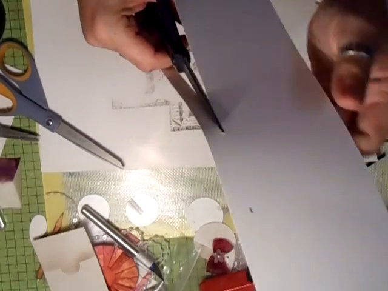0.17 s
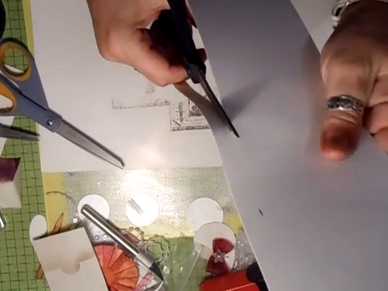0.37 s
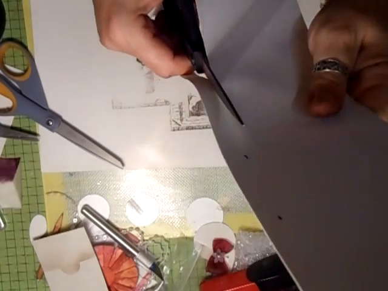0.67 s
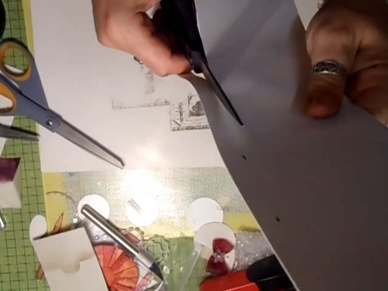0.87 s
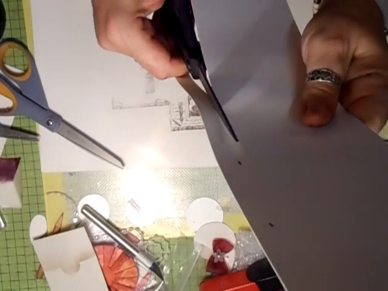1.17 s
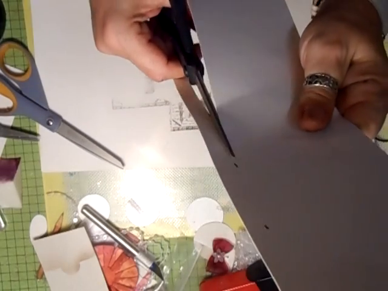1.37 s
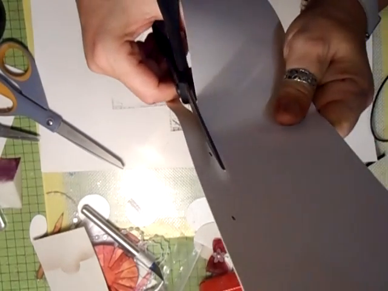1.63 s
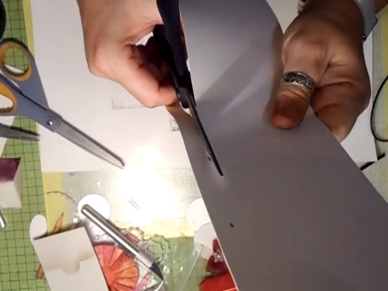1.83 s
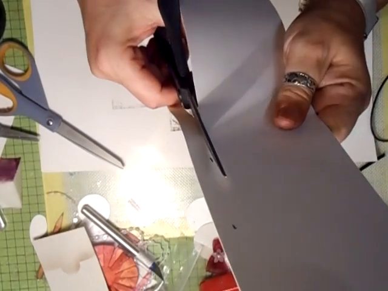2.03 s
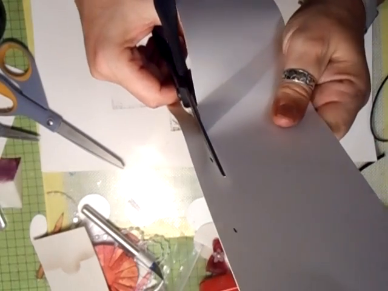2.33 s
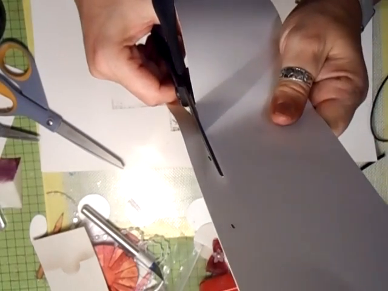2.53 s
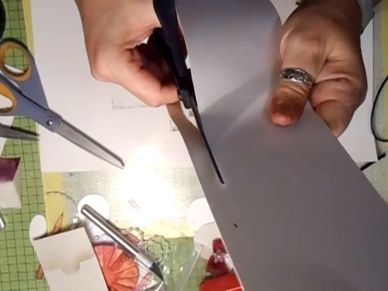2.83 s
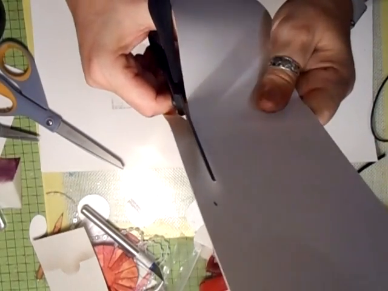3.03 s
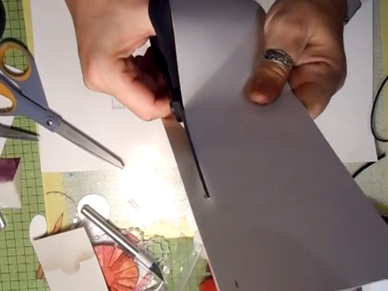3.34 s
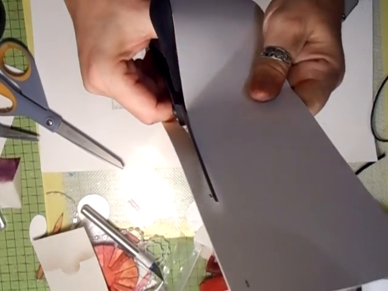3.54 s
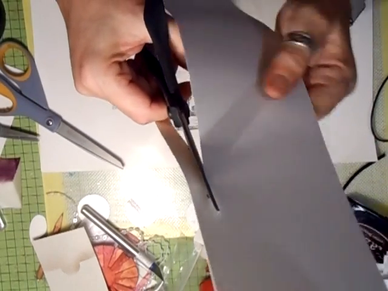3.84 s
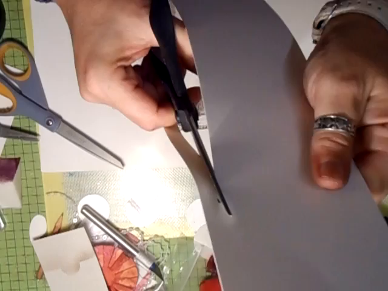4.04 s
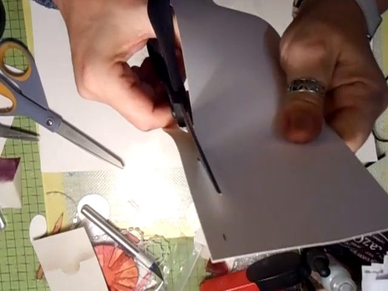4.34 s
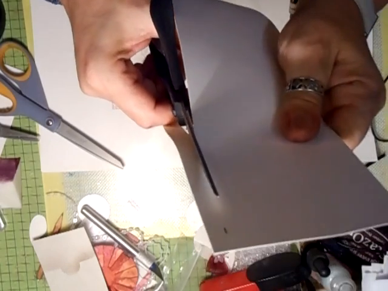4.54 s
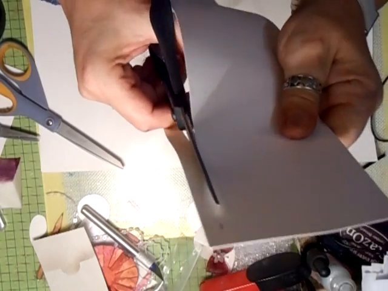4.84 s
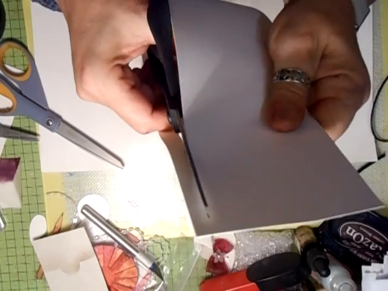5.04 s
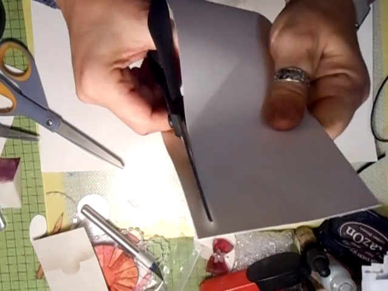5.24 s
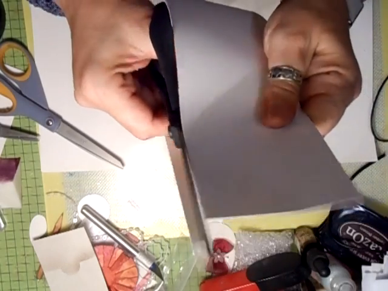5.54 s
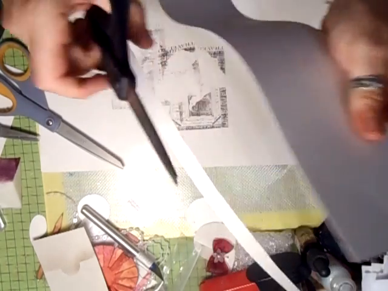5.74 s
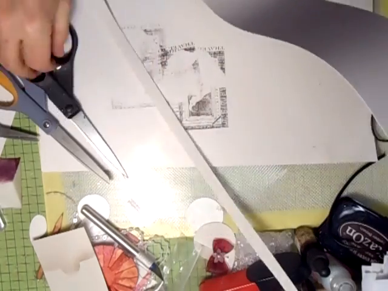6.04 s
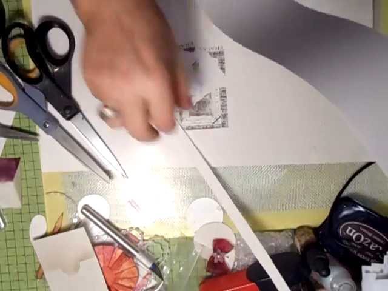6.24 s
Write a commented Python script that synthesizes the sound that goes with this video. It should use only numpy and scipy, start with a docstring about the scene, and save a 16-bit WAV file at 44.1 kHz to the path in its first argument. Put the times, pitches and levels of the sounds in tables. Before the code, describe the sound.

Dry, close stereo sound of scissors cutting card at a craft table. After initial rustling come slow, separated squeezes, each a cluster of crisp crunches that makes the sheet briefly hum. Scratchy blade scrapes and light ticks fill the gaps, with more crinkling as the sheet is regripped midway. A hard steel snap ends the cut, followed by rustling and a metallic put-down over soft room noise.

```python
"""Scissors cut a strip off a sheet of thin card, close up, over a craft table in a small room.
Each squeeze breaks the card in short bites: bursts of crackling fibres that set the held sheet ringing.
Between squeezes the opening blades rasp along the cut: uneven friction through card and blade resonances.
Ticks, squeaks, crinkles and thumps (shaped noise, wavering tones) fill in the handling over soft room noise.
The last squeeze snaps shut with a damped steel ring; then scissors and card are put down."""
import sys
import numpy as np
from scipy import signal
from scipy.fft import rfft, irfft
from scipy.io import wavfile

SR = 44100
rng = np.random.default_rng(int(sys.argv[2]) if len(sys.argv) > 2 else 0)


def wav_out(sig):
    """Save sig, one row per channel (or a flat mono array), as 16-bit PCM at SR to the path in sys.argv[1]."""
    wavfile.write(sys.argv[1], SR, np.round(np.clip(np.atleast_2d(sig).T, -1, 1) * 32767).astype(np.int16))


N = 282240
TIME, FREQS = np.arange(N) / SR, np.arange(N // 2 + 1) * SR / N
SHORT = TIME[:8192]  # time axis of a single short sound

# Levels are those at each source, ahead of the trims in its function, the room and the recorder.
# Background noise colour: f/Hz, density/dB
ROOM_TONE = [(20, -19), (40, -16), (120, -12), (350, -9.5), (900, -8.5), (1400, -10.5), (2400, -13),
             (3000, -16), (6000, -26.5), (14000, -37.5)]
# Stereo difference of that noise, relative to its middle: f/Hz, level/dB
ROOM_TONE_SIDE = [(40, -7.5), (250, -4), (1100, -6.5), (3000, -5.5), (7000, -0.5)]
# Clicks of card, pivot and handles: t/s, peak level/dB, centre f/Hz, width/octaves, ring t60/s
TICKS = [(.001, -24, 1400, 1.234, 0.0636), (.023, -33, 2500, 2.75, 0.029),
         (0.135, -37.5, 1997, 0.85, 0.089), (.15, -36.5, 2310, 0.764, .021),
         (.288, -28, 1540, 0.675, 0.0203), (.395, -31, 1680, 0.91, 0.0153),
         (.999, -33.5, 1270, 0.78, 0.0385), (2.296, -38, 1300, 0.72, 0.101),
         (2.463, -40, 1113, 0.593, 0.0254), (3.325, -36.5, 1630, 0.465, 0.0123),
         (3.533, -36.5, 2500, 0.95, 0.0079), (3.885, -27.5, 2100, 0.613, 0.019),
         (3.971, -30.5, 2204, 0.74, 0.012), (4.005, -26, 1200, 0.74, .05), (4.115, -33.5, 1875, 0.53, .031),
         (4.16, -26.5, 1660, 0.796, 0.0181), (4.467, -42.5, 2310, 0.78, 0.0086),
         (4.772, -31, 2380, 0.54, 0.0137), (4.832, -43, 6870, 0.65, 0.0135),
         (4.94, -28, 1494, 0.61, 0.0133), (4.97, -21.5, 1980, 0.356, 0.0041),
         (5.082, -36, 7050, 1.9, 0.0088), (5.784, -35, 2497, 0.665, 0.0319),
         (5.948, -33.5, 4150, 1.09, 0.046), (6.008, -24, 7930, 1.35, 0.0074),
         (6.018, -19.5, 3290, 0.61, 0.0118), (6.035, -26.5, 3770, 0.79, 0.0122),
         (6.134, -25.5, 2478, 0.523, 0.019), (6.174, -10.5, 2734, 0.612, 0.00328)]
# Edges and handles catch and squeak: t/s, length/s, f/Hz, level/dB
SQUEAKS = [(0.023, 0.0095, 1511, -34.5), (2.18, 0.0129, 2420, -50), (2.184, 0.047, 2004, -54.5),
           (4.984, 0.0165, 1440, -25.5), (6.06, 0.0022, 3200, -32), (6.066, 0.00278, 3174, -30),
           (6.075, 0.00246, 3240, -30.5)]
# The hand shifts the sheet: t/s, attack/s, hold/s, time to fall 20 dB/s (sign ignored), rasp level/dB,
# flex level re rasp/dB, hiss level re rasp/dB
SHEET_SHIFTS = [(0.109, 0.2025, 0.097, 0.1371, -56, -2.5, -4),
                (0.408, 0.0708, 0.2421, 0.055, -44, -2.5, -15.5),
                (0.477, 0.0865, 0.0424, 0.0762, -57, -9.5, 1), (0.801, 0.099, 0.475, 0.22, -61, 0, -24.5),
                (3.516, 0.024, 0.06, 0.78, -63, 3.5, -35), (3.86, 0.01274, 0.378, -0.33, -54.5, -3, -7),
                (3.932, 0.0096, 0.0332, 0.0463, -44, 0.5, -32), (4.194, 0.045, 0.0125, 0.1, -46, -4, -1),
                (4.222, 0.0632, 0.0531, 0.1137, -43.5, -2, -17),
                (4.515, 0.057, 0.0243, -0.0144, -57.5, 3, -30),
                (4.845, 0.0146, 0.037, 0.62, -59.5, -4.5, -8), (5.479, 0.024, 0.039, 0.48, -69, -12.5, 4),
                (5.677, 0.017, 0.068, -0.31, -60.5, -7.5, -0.5),
                (5.806, 0.014, 0.0165, 0.16, -59, -12.5, 3.5),
                (5.922, 0.0356, 0.2414, 0.01, -54.5, -4.5, -4), (6.284, 0.08, 0.075, .05, -61, -20.5, -20)]
# The blades open and slide on along the cut: t/s, attack/s, hold/s, time to fall 20 dB/s, scrape level/dB,
# blade ring level re card rasp/dB, upper blade mode level/dB
BLADE_OPENINGS = [(1.567, 0.0154, 0.0878, 0.142, -40.5, 2.5, 0), (2.956, 0.0253, 0.0564, 0.1, -36, -3, -2),
                  (3.399, 0.0174, 0.0672, 0.0752, -35, 4.5, 1),
                  (4.939, 0.0066, 0.0681, 0.0423, -33.5, 1.5, -1),
                  (5.357, 0.0088, 0.0812, 0.0727, -35, 1.5, 8)]
# Rasp of the card under the sliding blades: f/Hz, density/dB
RASP_COLOUR = [(60, -57.5), (300, -31), (900, 1.5), (1400, 4), (2000, 6.5), (2600, 3), (3400, -3.5),
               (4300, -4), (4800, -8), (6000, -41.5), (9000, -33)]
# Hiss of the fine nap of the card: f/Hz, level/dB
HISS_COLOUR = [(3000, -3), (5500, 12), (7500, 7.5), (10000, 3.5), (14000, 2.5)]
# Blades ringing where their edges rub: f/Hz, width/Hz, level/dB
EDGE_MODES = [(1392, 349, -1), (1857, 277, -0.5), (2430, 457, 0), (2685.5, 154, -2.5), (3001, 287, -3),
              (3327, 153, -3.5), (4263, 93, -15.5), (5232, 265, -11), (5890, 146, -20.5)]
# Flexing of the held sheet, before each grip retunes and tilts it: f/Hz, width/Hz, level/dB
SHEET_MODES = [(445.2, 25.3, 2.5), (539.5, 63, -1), (879.6, 76.4, 4), (958.7, 82, -11)]
# Soft knocks of hand, card and handles on the table: t/s, peak level/dB, f/Hz, t60/s
THUMPS = [(.158, -37.5, 823, 0.0163), (.287, -34, 585, 0.0039), (0.397, -43, 124, 0.048),
          (0.412, -39.5, 256, 0.0287), (.495, -37.5, 474, 0.0214), (4.156, -37, 263, 0.0096),
          (5.776, -42, 452, 0.029), (6.114, -40, 380, 0.0098), (6.178, -37.5, 158.6, 0.031),
          (6.201, -46, 115.8, 0.088)]
# The card crinkles while it is moved: start t/s, end t/s, crinkles per s, typical peak level/dB
HANDLING = [(0.236, .44, 54.8, -46.5), (0.473, .71, 53, -37), (3.893, 4.15, 35.3, -40.5),
            (4.209, 4.35, 50, -30), (5.757, 5.95, 37, -40), (5.95, 6.24, 56.8, -33.5)]
# The blades break through the card: t/s, nominal length/s, crunch level/dB
BITES = [(1.079, 0.0097, -43), (1.101, 0.00945, -44), (1.2056, 0.008, -28), (1.234, 0.00786, -36),
         (1.343, 0.00947, -31.5), (1.397, 0.00925, -25), (1.435, 0.01144, -40), (1.462, 0.0079, -39),
         (2.682, 0.0121, -45), (2.715, 0.01897, -42.5), (2.749, 0.0124, -37), (2.7858, 0.0102, -29.5),
         (3.182, 0.0201, -41.5), (3.208, 0.00604, -36.5), (3.233, 0.00972, -28), (3.266, 0.01356, -32),
         (3.665, 0.01052, -36), (3.699, 0.0104, -28.5), (3.731, 0.01043, -26.5), (3.761, 0.0142, -39.5),
         (4.642, 0.0132, -38), (4.659, 0.01336, -43.5), (4.7102, 0.0121, -29.5), (4.745, 0.01943, -33),
         (5.14, 0.0065, -39.5), (5.173, 0.009, -22), (5.206, 0.0148, -27.5), (5.239, 0.009, -36),
         (5.615, 0.0122, -33.5), (5.636, 0.0151, -27), (5.652, 0.0159, -32), (5.667, 0.00995, -24.5)]
# Each squeeze holds the sheet anew: middle t/s, flex level re crunch/dB, fibre snap level re crunch/dB,
# upper crunch level re lower/dB, tilt of the sheet modes/dB per octave, their tuning ratio
SQUEEZES = [(1.09, -2.5, -10.5, -1, 0, 1.15), (1.22, -3.5, -9, -1, -1.5, 1.08),
            (1.4, 1, -7, 6, 12.5, 1.013), (2.74, 0.5, -9, -2.5, -0.5, 1.054),
            (3.23, -3.5, -10, 1.5, -2, 1.024), (3.71, 1.5, -8.5, 5.5, 3, 1.074),
            (4.7, 2, -8.5, -1, 5, 1.0306), (5.19, -1, -9.5, 1, 8.5, 1.024),
            (5.64, -4.5, -6, 1.5, 1.5, 1.014)]
# Crunch of the breaking card: f/Hz, density/dB
CRUNCH_COLOUR = [(30, -30.5), (120, -57), (300, -16.5), (800, -8.5), (1200, 0), (1650, 1), (2050, -1),
                 (2450, -3), (3300, -4), (3900, -12), (4500, -16), (6000, -28), (12000, -65)]
# Bright snap of single fibres: f/Hz, level/dB
FIBRE_COLOUR = [(2000, -46), (4000, 3), (4900, 6.5), (6200, -1.5), (7500, -4.5), (9200, -4.5), (10400, 0.5),
                (11300, 3), (12200, -19), (14000, 0)]
# Steel hits steel or the table: t/s, peak level/dB, treble tilt/dB (doubled in the level at 14 kHz)
CLACKS = [(5.671, -2.5, -6.5), (5.6728, -7.5, 1), (6.0828, -8, 3)]
# Damped ring of the steel: f/Hz, level/dB, t60/s
STEEL_MODES = [(1555, 12, 0.0435), (2220, 8, 0.0246), (3060, -17.5, .1), (4070, 12.5, 0.0137),
               (6098, 11, 0.0273), (7165, 8.5, 0.0583), (8980, 4.5, 0.0292), (10300, -12, .025),
               (10940, 4.5, 0.02), (13300, -1, 0.027)]
# Lead of the left port over the right: f/Hz, phase/rad
PORT_PHASE = [(0, 0), (2000, 0.123), (6000, 0.31), (10000, 0.775), (14000, 0.61)]


def undb(db):
    """Decibels to gain."""
    return 10 ** (np.asarray(db) / 20)


def unit(x):
    """Scale to rms 1."""
    return x / np.sqrt(np.mean(x ** 2))


def peak_at(db, x):
    """Scale to a peak level in dB."""
    return x * undb(db) / np.abs(x).max()


def add(track, s, sound):
    """Mix a sound into a track at s seconds."""
    start = max(int(s * SR), 0)
    track[start:start + len(sound)] += sound[:N - start]


def through(x, response):
    """Play x through an impulse response."""
    return signal.fftconvolve(x, response)[:len(x)]


def colour(points, size=4096):
    """Causal, minimum-phase impulse response of a (Hz, dB) spectrum."""
    hz, db = np.transpose(points)
    bins_hz = np.arange(size // 2 + 1) * SR / size
    gain = undb(np.interp(np.log(bins_hz + 1), np.log(hz), db))
    # folding the cepstrum forward puts the energy as early as it can be
    cepstrum = irfft(np.log(gain))
    cepstrum[1:size // 2] *= 2
    cepstrum[size // 2 + 1:] = 0
    return irfft(np.exp(rfft(cepstrum)))


def resonances(modes):
    """Impulse response of steep resonances, each swelling briefly before it decays."""
    response = 0
    for hz, width, db in modes:
        swell_and_decay = width ** 2 * SHORT * np.exp(-np.pi * width * SHORT)
        response = response + undb(db) * swell_and_decay * np.cos(2 * np.pi * hz * SHORT)
    return response


def sheet_response(tilt_db, tuning):
    """Impulse response of the flexing card for one grip: damped modes, retuned and tilted."""
    response = 0
    for hz, width, db in SHEET_MODES:
        decay = width * np.exp(-np.pi * width * SHORT)
        response = response + undb(db + tilt_db * np.log2(hz)) * decay * np.cos(2 * np.pi * hz * tuning * SHORT)
    return response


def crackle(count, spread_db):
    """Dense tiny fractures of very unequal size."""
    return rng.standard_normal(count) * undb(spread_db * rng.standard_normal(count))


def walk(rate):
    """Random drift with a spread near 1, gliding between new values at the given rate per second."""
    knots = rng.standard_normal(N)
    return np.interp(TIME * rate, np.arange(N), knots)


def room_tone(tone_db=-60.0, waver_db=1, waver_rate=1.772, whine_hz=1140, whine_width=80, whine_db=-67.0):
    """Soft, slightly wavering noise with a faint whine, as of a small fan."""
    mid, side = (unit(through(rng.standard_normal(N), colour(ROOM_TONE))) for _ in range(2))
    whine = unit(through(rng.standard_normal(N), resonances([(whine_hz, whine_width, 0)])))
    air = mid + through(side, colour(ROOM_TONE_SIDE)) * np.array([[1], [-1]])
    return air * undb(tone_db + waver_db * walk(waver_rate)) + undb(whine_db) * whine


def ticks(skirt_db=13, after_db=-25, after_t60=0.034):
    """A sharp contact with a brief rattle, coloured by the part that is touched."""
    out, hz = np.zeros(N), np.geomspace(50, SR / 2, num=60)
    for s, db, centre_hz, octaves, ring_t60 in TICKS + crinkles():
        contact_and_rattle = undb(-60 * SHORT / ring_t60) + undb(after_db - 60 * SHORT / after_t60)
        force = rng.standard_normal(len(SHORT)) * contact_and_rattle
        # one broad hump around the centre, with falling skirts
        shape = -skirt_db * np.log10(1 + (np.log2(hz / centre_hz) / octaves) ** 4)
        tick = through(force, colour(np.column_stack([hz, shape])))
        add(out, s, peak_at(db, tick))
    return out


def squeaks(waver=0.01192, waver_rate=250):
    """Brief stick-slip tones of unsteady pitch."""
    out, drift = np.zeros(N), 1 + waver * walk(waver_rate)
    for s, length, hz, db in SQUEAKS:
        swell = np.sin(np.pi * np.clip((TIME - s) / length, 0, 1))
        phase = 2 * np.pi * np.cumsum(hz * drift) / SR
        out += undb(db) * swell * np.sin(phase)
    return out


def stroke(s, attack, hold, release, arch_db=2, braking=1.075):
    """One hand movement: it rises, holds in a slight arch, then falls ever faster as the hand stops."""
    since = TIME - s
    rise = np.clip(since / attack, 0, 1)
    arch = np.sin(np.pi * np.clip(since / (attack + hold), 0, 1)) - 1
    fall = (np.maximum(since - attack - hold, 0) / abs(release)) ** braking
    return rise * undb(arch_db * arch - 20 * fall)


def slides(spread_db=5.5, fine_db=3, catch_db=1.5, catch_rate=170, wander_db=3.0, wander_rate=60,
           split_hz=2500, sheet_db=-5, shift_ring_db=-6, slide_db=-0.1454):
    """Uneven friction shakes the card and rings the blades; the colour wanders as the contact moves."""
    catches = undb(catch_db * walk(catch_rate))
    rub = crackle(N, spread_db) * catches
    scratch = crackle(N, spread_db) * catches

    def wandering(drive, body):
        """Friction through a body whose level wanders."""
        return through(drive, body) * undb(wander_db * walk(wander_rate))

    flapping = colour([(40, -28), (150, -10.5), (400, -2.5), (700, 3.5), (1000, 8.5), (1500, -5.5), (4000, -69.5)])
    rasp = unit(wandering(rub, colour(RASP_COLOUR)))
    flap = unit(wandering(rub, flapping))
    sheet = unit(wandering(rub, sheet_response(0, 0.932)))
    card = unit(flap + undb(sheet_db) * sheet)
    # the nap is finer grained and feels the catches less
    hiss = unit(through(crackle(N, fine_db), colour(HISS_COLOUR)) * np.sqrt(catches))
    edge_rings = [(mode[0], wandering(scratch, resonances([mode]))) for mode in EDGE_MODES]

    def scrape(ring_db, upper_db):
        """Rasp of the card with the ring of the blades in it."""
        edges = unit(sum(ring * undb(upper_db * (hz > split_hz)) for hz, ring in edge_rings))
        return unit(rasp + undb(ring_db) * edges)

    # alike in every opening: flutter of the sheet and hiss of its nap, swelling more slowly than the scrape
    flex_and_nap = undb(-45) * card + undb(-52) * hiss
    swell_s = 0.0276
    out = np.zeros(N)
    for s, attack, hold, release, db, ring_db, upper_db in BLADE_OPENINGS:
        swelling = np.clip((TIME - s) / swell_s, 0, 1) * flex_and_nap
        out += stroke(s, attack, hold, release) * (undb(db) * scrape(ring_db, upper_db) + swelling)
    rustle = scrape(shift_ring_db, 0)
    for s, attack, hold, release, db, flex_db, hiss_db in SHEET_SHIFTS:
        shift = rustle + undb(flex_db) * card + undb(hiss_db) * hiss
        out += stroke(s, attack, hold, release) * undb(db) * shift
    return undb(slide_db) * out


def thumps(push_s=0.00786):
    """Soft pushes into a low, damped resonance."""
    out = np.zeros(N)
    for s, db, hz, t60 in THUMPS:
        push = rng.standard_normal(len(SHORT)) * SHORT * np.exp(-2 * SHORT / push_s)
        thump = through(push, undb(-60 * SHORT / t60) * np.cos(2 * np.pi * hz * SHORT))
        add(out, s, peak_at(db, thump))
    return out


def crinkles(centre_hz=2400, octaves=0.847, ring_t60=0.0066, spread_db=-1.0):
    """Small random buckles of the moving card, as rows like those of TICKS, each with its own size and pitch."""
    rows = []
    for start, end, rate, db in HANDLING:
        gap, size, pitch = rng.uniform(-1, 1, (64, 3)).T
        times = start + np.cumsum(1 + gap) / rate
        for s, a, p in zip(times, size, pitch):
            if s < end:
                rows.append((s, db + spread_db * a, centre_hz * 2 ** p, octaves, ring_t60))
    return rows


def bites(skew=0.714, fullness=0.772, overrun=1.186, spread_db=4, after_db=-22, after_t60=0.285,
          crunch_db=-1.0, fray_db=-10, split_hz=2300):
    """Each bite is a swelling burst of breaking fibres; the sheet flexes with it and shivers on."""
    usual_bite_db, flex_loss_db_per_db = -35.5, 0.194  # harder bites flex the sheet relatively less
    dulling_db_per_s = 45  # the crunch dulls as the cut runs towards the tips
    sharpening_per_s = 5.9  # the blades ease in early in a squeeze and catch more abruptly later
    detuning = 0.026  # largest share by which a bite detunes the sheet
    out, fibres = np.zeros(N), colour(FIBRE_COLOUR)
    for s, length, db in BITES:
        squeeze = min(SQUEEZES, key=lambda row: abs(row[0] - s))
        middle, grip_db, snap_db, upper_db, tilt, tuning = squeeze
        into_squeeze = s - middle
        flex_db = grip_db - flex_loss_db_per_db * (db - usual_bite_db)
        upper = upper_db - dulling_db_per_s * into_squeeze
        sheet = sheet_response(tilt, tuning * (1 + detuning * rng.uniform(-0.99, 1)))
        crunch = colour([(hz, level + upper * (hz > split_hz)) for hz, level in CRUNCH_COLOUR])

        progress = np.clip(SHORT / (length * overrun), 0, 1)
        lean = max(skew - sharpening_per_s * into_squeeze, .3)  # lower puts the peak earlier
        burst = np.abs(np.sin(np.pi * progress ** lean)) ** fullness
        shiver = undb(after_db - 60 * SHORT / after_t60) * progress
        grain = crackle(len(SHORT), spread_db)
        parts = [(crunch, burst + shiver, crunch_db),
                 (sheet, burst + shiver / 2, flex_db),
                 (fibres, burst + undb(fray_db) * shiver, snap_db)]
        # the level is the rms with all energy counted over the nominal length
        loudness = np.sqrt(length / SHORT[-1])
        for body, drive, part_db in parts:
            add(out, s, unit(through(grain * drive, body)) * undb(db + part_db) * loudness)
    return out


def clacks(crack_t60=0.005, ring_db=-30):
    """A hard noise crack with the damped ring of the steel in it."""
    out = np.zeros(N)
    ring = sum(undb(db - 60 * SHORT / t60) * np.sin(2 * np.pi * hz * SHORT) for hz, db, t60 in STEEL_MODES)
    for s, db, tilt in CLACKS:
        crack = rng.standard_normal(len(SHORT)) * undb(-60 * SHORT / crack_t60)
        hit = colour([(60, -44), (300, -13.5), (1100, -19.5), (2000, -1.0), (5000, -3), (14000, 2 * tilt - 6)])
        add(out, s, peak_at(db, through(crack + undb(ring_db) * ring, hit)))
    return out


def ports(x, balance_db=-.7, scatter_db=-14, scatter_s=0.00245):
    """Two close ports hear the work a moment apart; table reflections scatter the treble between them."""
    lead = np.interp(FREQS, *np.transpose(PORT_PHASE))
    pair = []
    for sign in (1, -1):
        shifted = irfft(rfft(x) * np.exp(.5j * sign * lead), N)
        pair.append(shifted * undb(sign * balance_db / 2))
    reflections = rng.standard_normal(len(SHORT)) * SHORT * np.exp(-2 * SHORT / scatter_s)
    treble = colour([(1000, -38), (4000, -16.5), (8000, -4.5), (13000, -37.0)])
    scattered = through(through(x, reflections / np.linalg.norm(reflections)), treble)
    return np.array(pair) + undb(scatter_db) * scattered * np.array([[1], [-1]])


def room(dry, wet_db=-15, low_t60=0.149, high_t60=0.188, split_hz=3000, build_s=0.00413,
         low_side_db=-13, high_side_db=-4, absorb_db=-7):
    """A short noise tail from table and walls; only its treble differs much between the ports."""
    t, out = TIME[:SR // 2], 0
    dry = through(dry, colour([(5000, 0.0044), (11000, absorb_db)]))  # paper and cloth soak up the top
    for kind, t60, side_db in ("low", low_t60, low_side_db), ("high", high_t60, high_side_db):
        band = signal.butter(2, split_hz, kind, fs=SR, output="sos")
        decay = undb(-60 * t / t60) * (1 - np.exp(-(t / build_s) ** 2))
        decay = decay / np.linalg.norm(decay)
        mid, side = (through(dry, signal.sosfilt(band, rng.standard_normal(len(t))) * decay) for _ in range(2))
        out = out + mid + undb(side_db) * side * np.array([[1], [-1]])
    return undb(wet_db) * out


def scene(lowest_hz=95):
    """All the handwork, its room and the background noise."""
    # card and blades are too small to radiate deep bass
    small = signal.butter(2, lowest_hz, "high", fs=SR, output="sos")
    card_and_blades = ticks() + squeaks() + slides() + bites() + clacks()
    work = signal.sosfilt(small, card_and_blades) + thumps()
    return ports(work) + room(work) + room_tone()


def record(dry, top_hz=14000):
    """The recorder softly rounds the loudest peaks and cuts the top."""
    rounded = np.tanh(1.3 * dry) / 1.3
    return signal.sosfilt(signal.ellip(8, .2, 70, top_hz, fs=SR, output="sos"), rounded)


dry = scene()
out = record(dry)
wav_out(out)
```